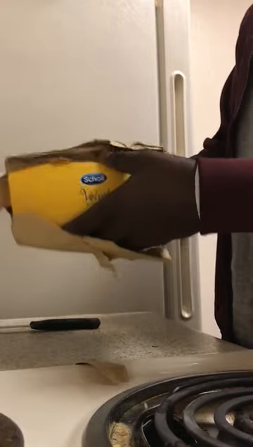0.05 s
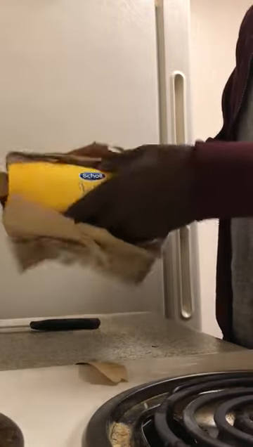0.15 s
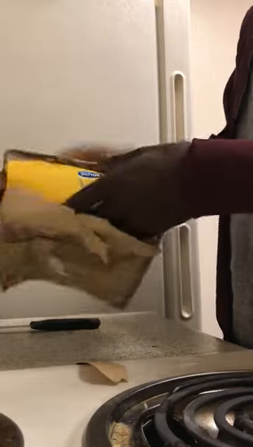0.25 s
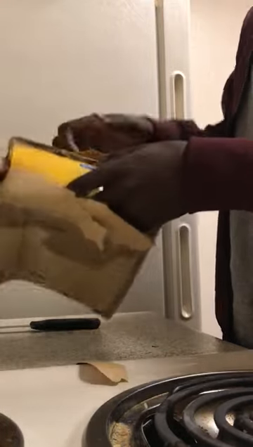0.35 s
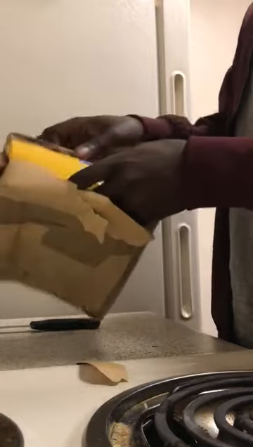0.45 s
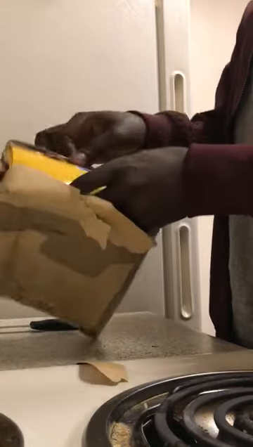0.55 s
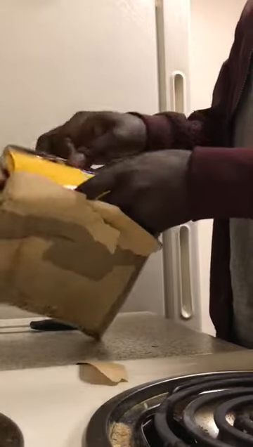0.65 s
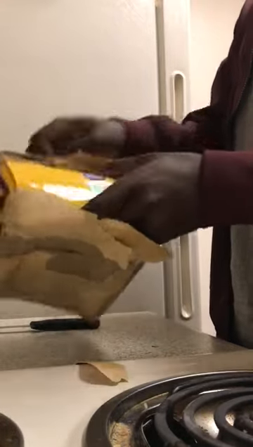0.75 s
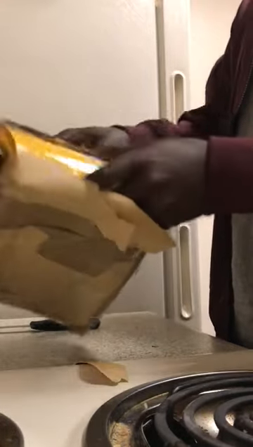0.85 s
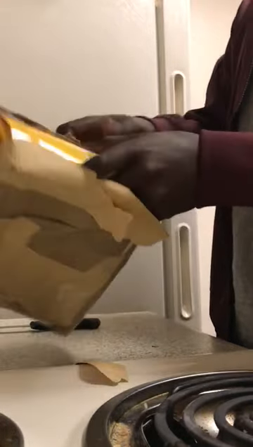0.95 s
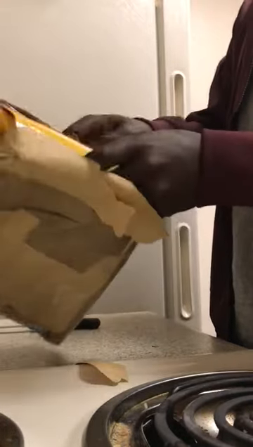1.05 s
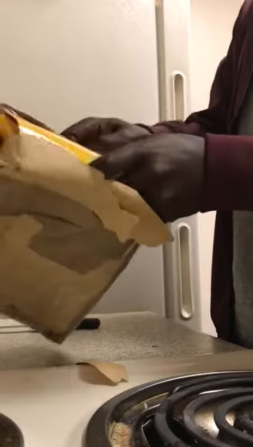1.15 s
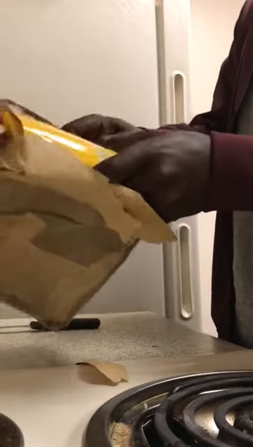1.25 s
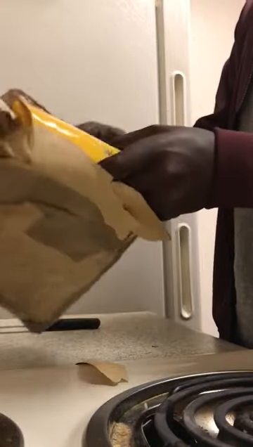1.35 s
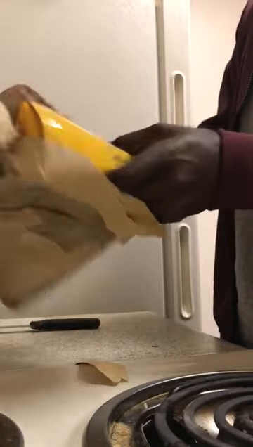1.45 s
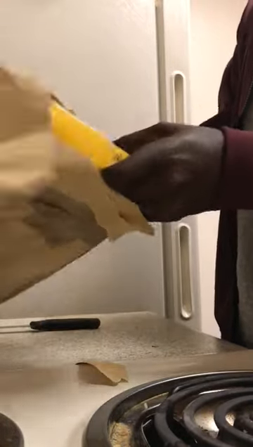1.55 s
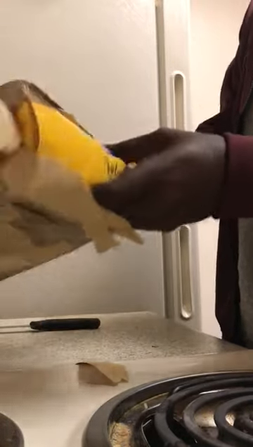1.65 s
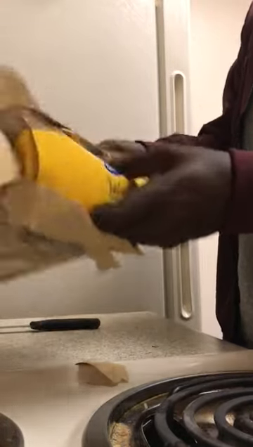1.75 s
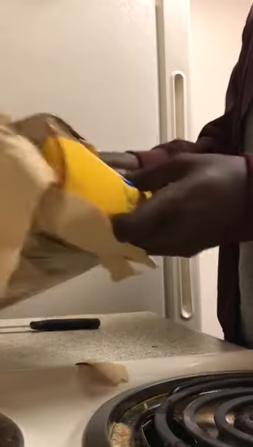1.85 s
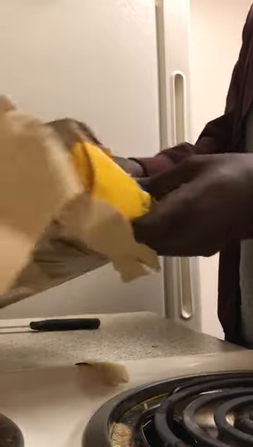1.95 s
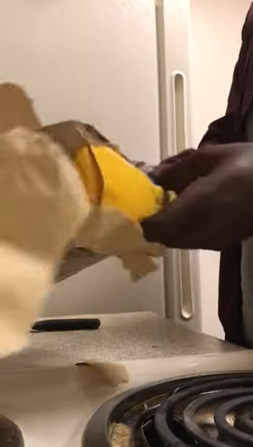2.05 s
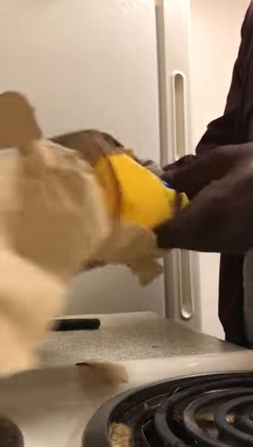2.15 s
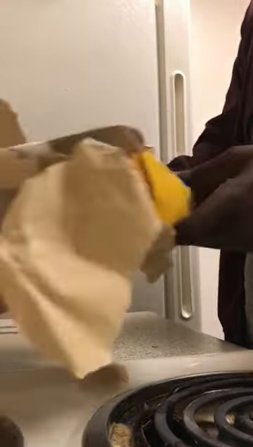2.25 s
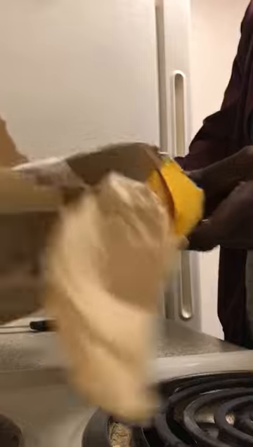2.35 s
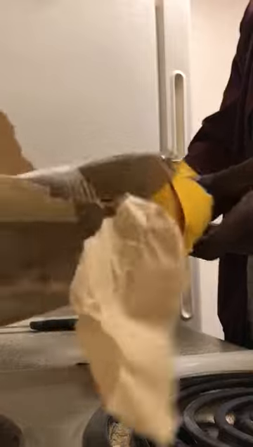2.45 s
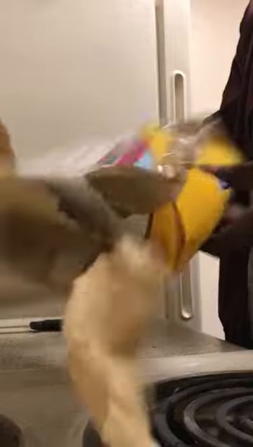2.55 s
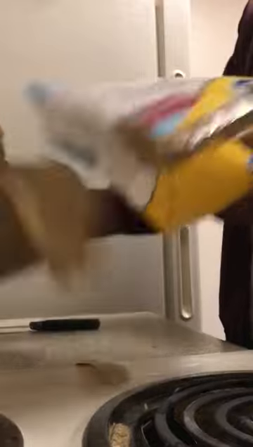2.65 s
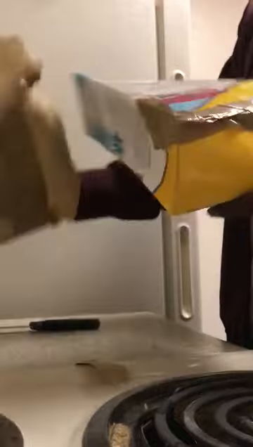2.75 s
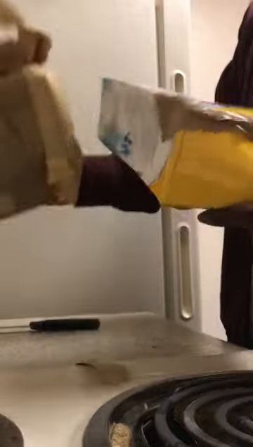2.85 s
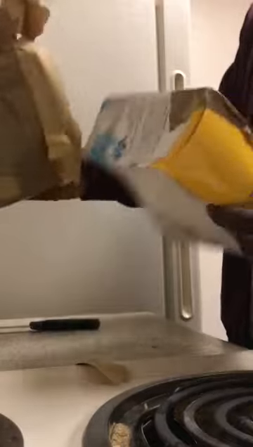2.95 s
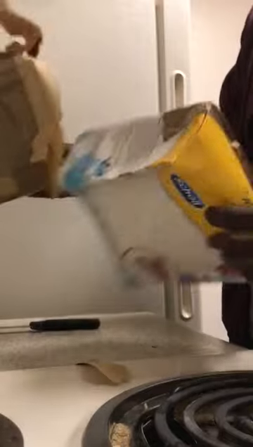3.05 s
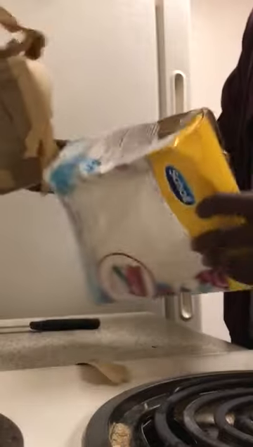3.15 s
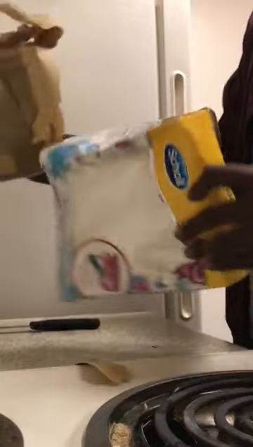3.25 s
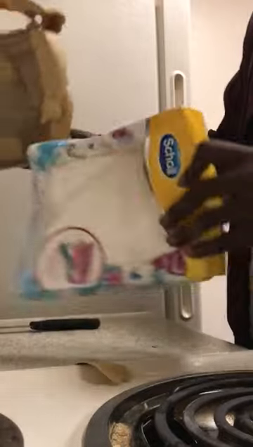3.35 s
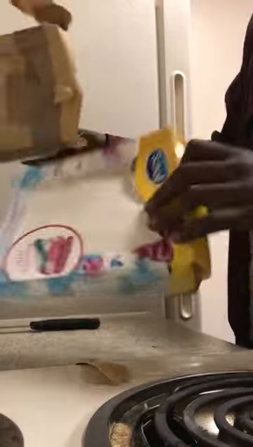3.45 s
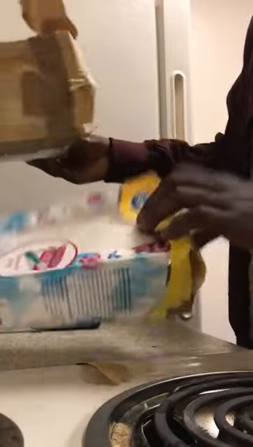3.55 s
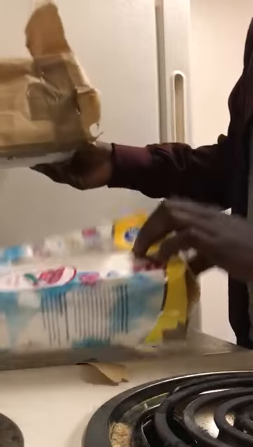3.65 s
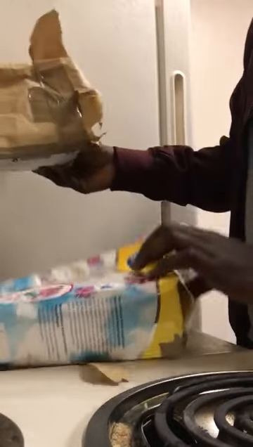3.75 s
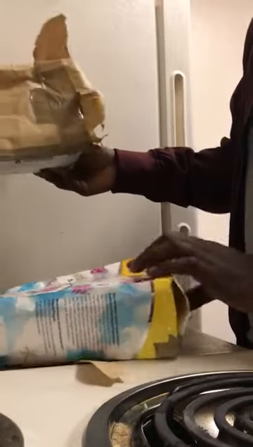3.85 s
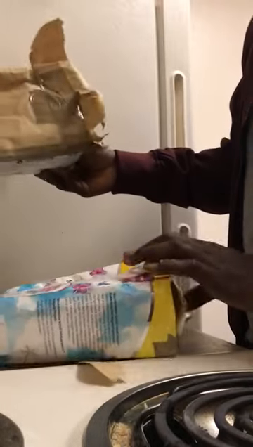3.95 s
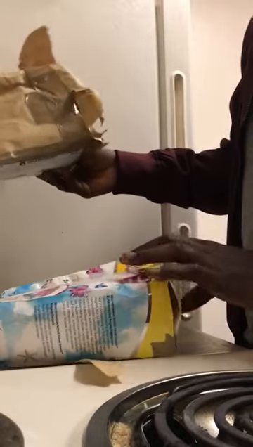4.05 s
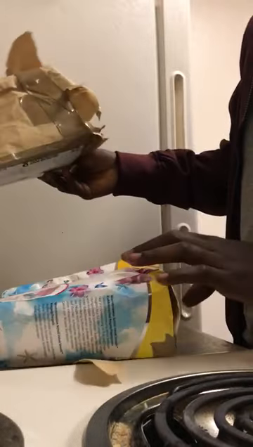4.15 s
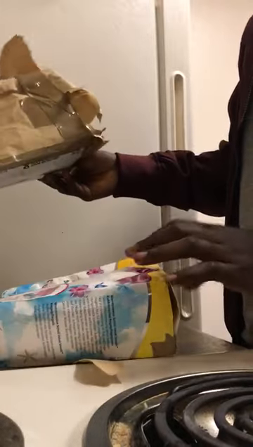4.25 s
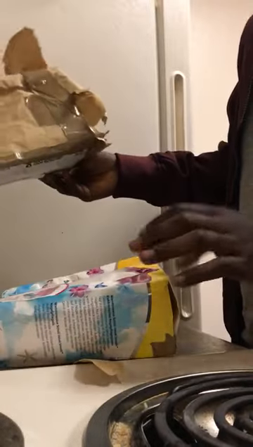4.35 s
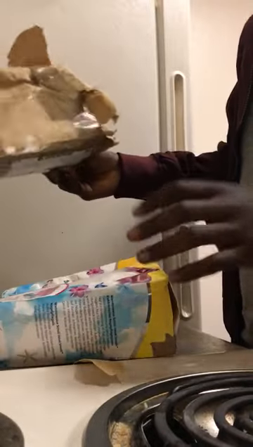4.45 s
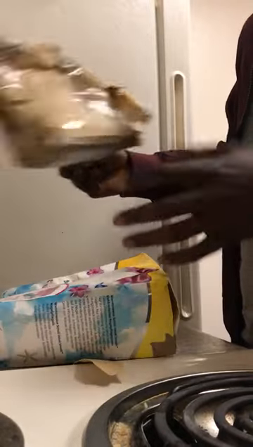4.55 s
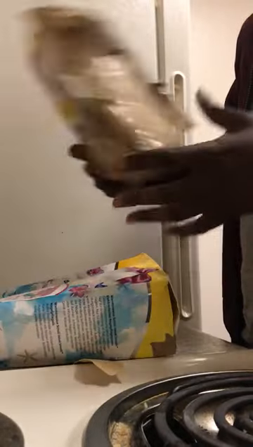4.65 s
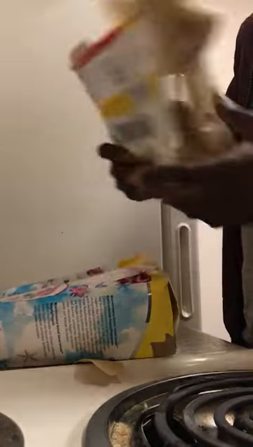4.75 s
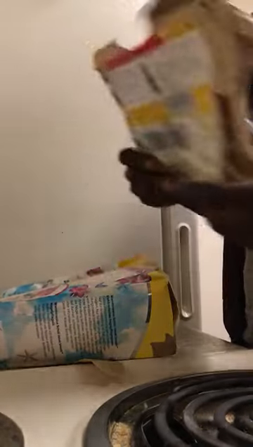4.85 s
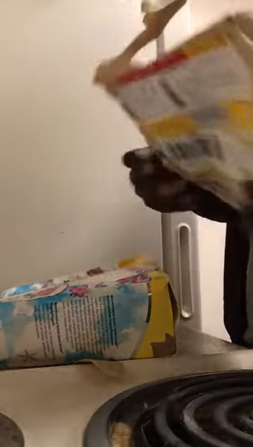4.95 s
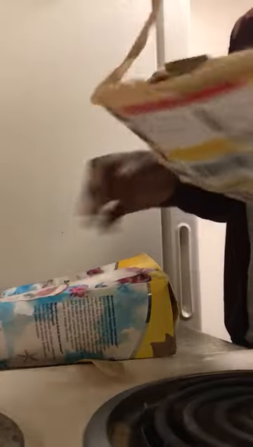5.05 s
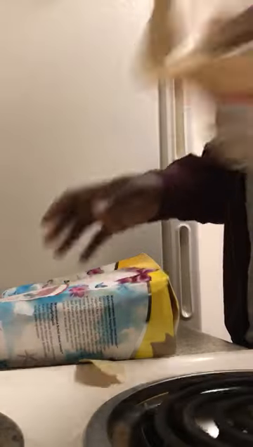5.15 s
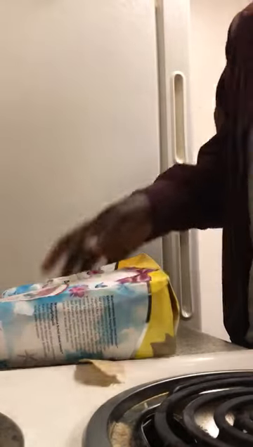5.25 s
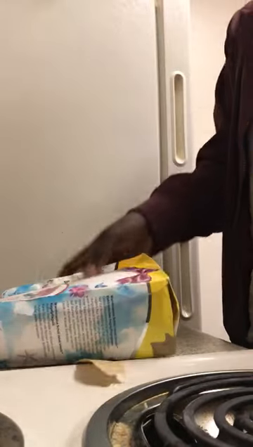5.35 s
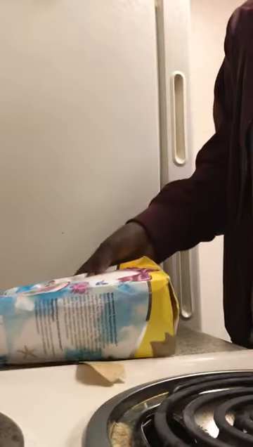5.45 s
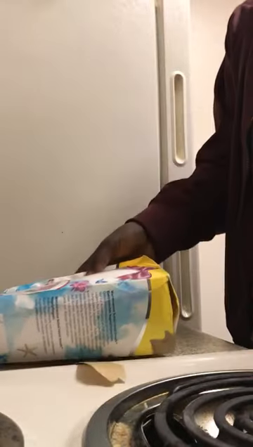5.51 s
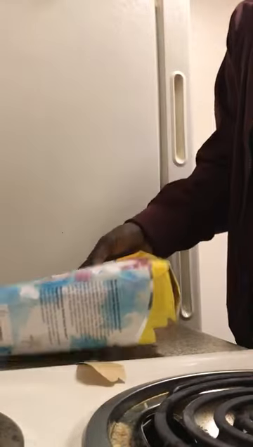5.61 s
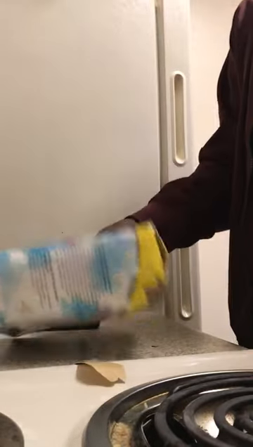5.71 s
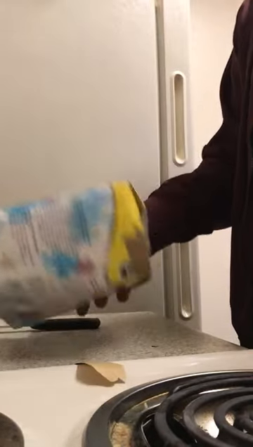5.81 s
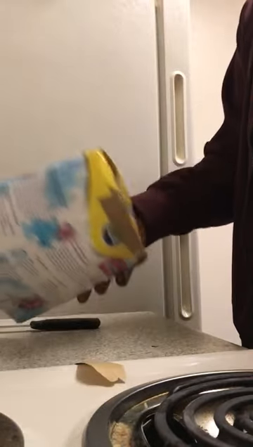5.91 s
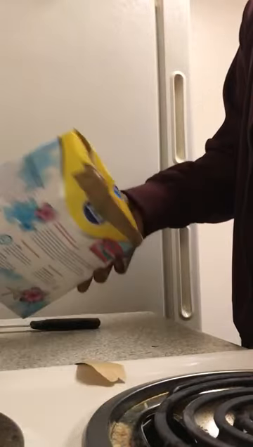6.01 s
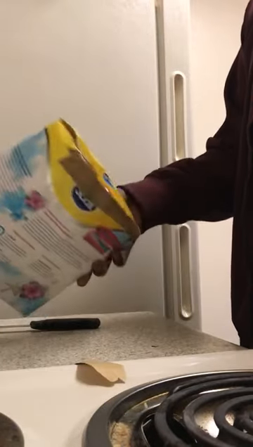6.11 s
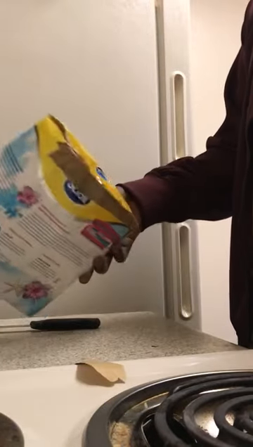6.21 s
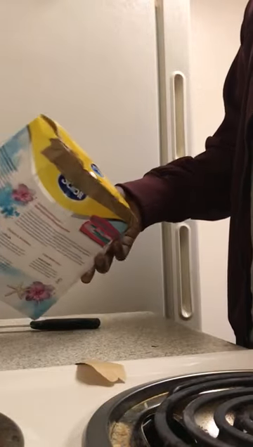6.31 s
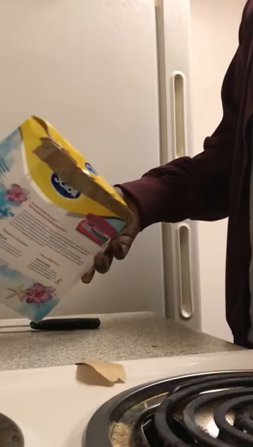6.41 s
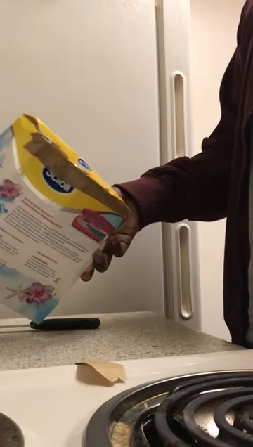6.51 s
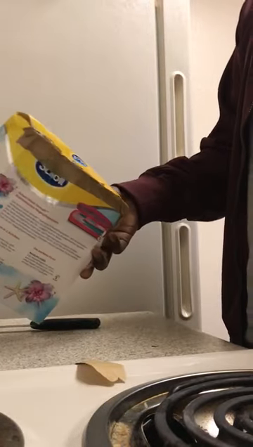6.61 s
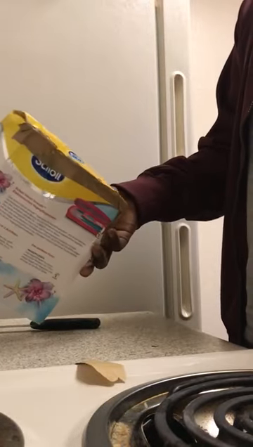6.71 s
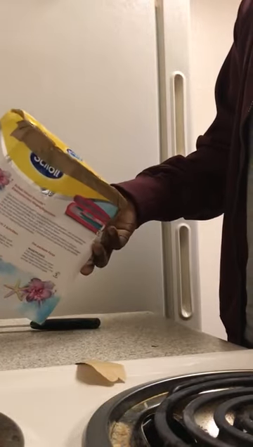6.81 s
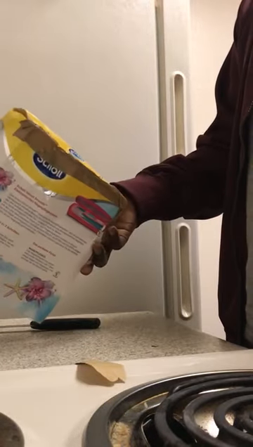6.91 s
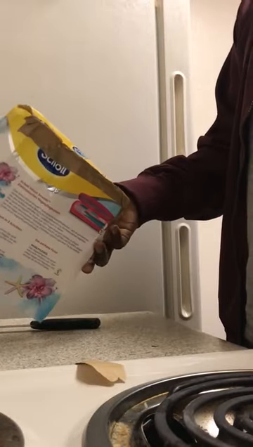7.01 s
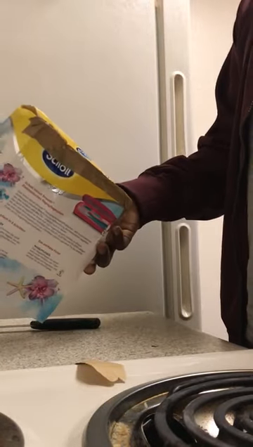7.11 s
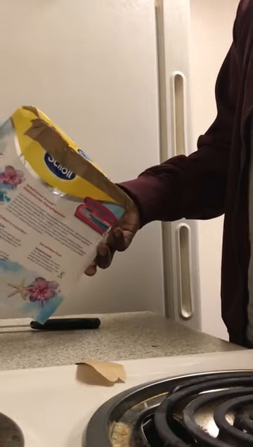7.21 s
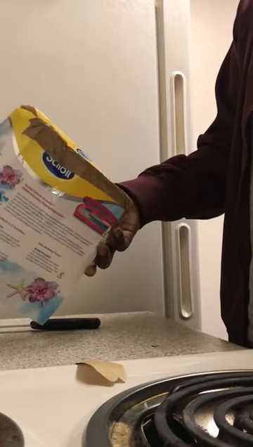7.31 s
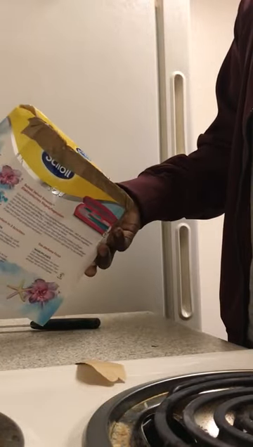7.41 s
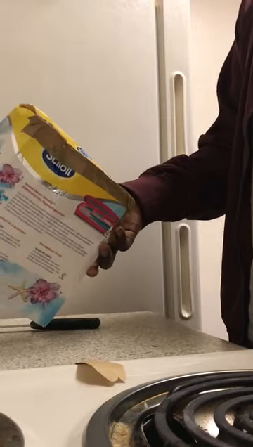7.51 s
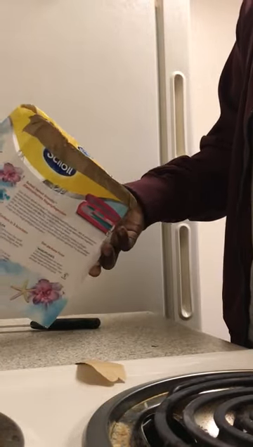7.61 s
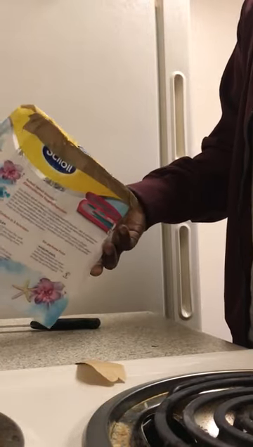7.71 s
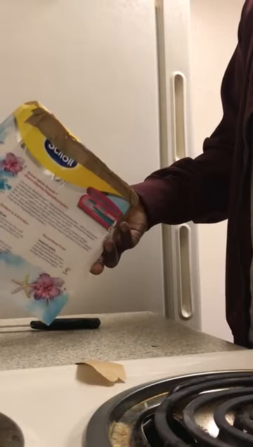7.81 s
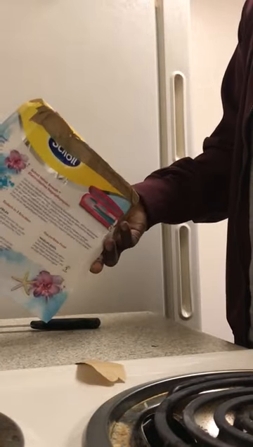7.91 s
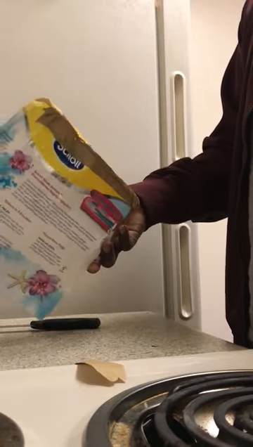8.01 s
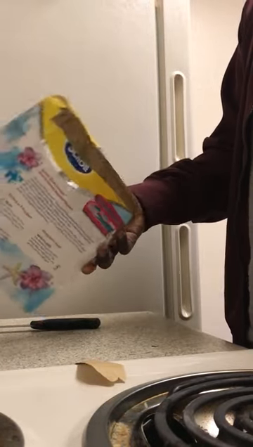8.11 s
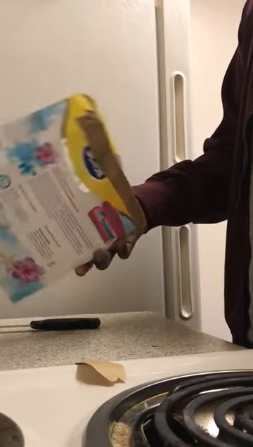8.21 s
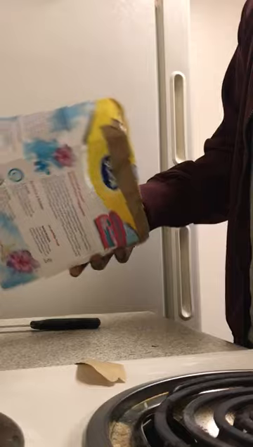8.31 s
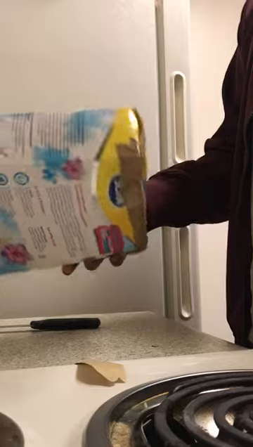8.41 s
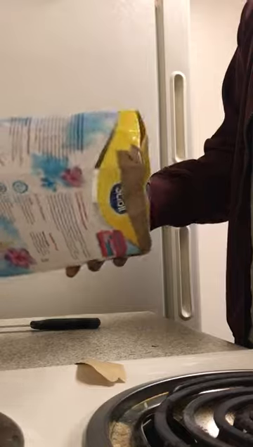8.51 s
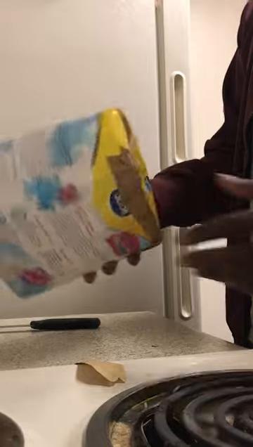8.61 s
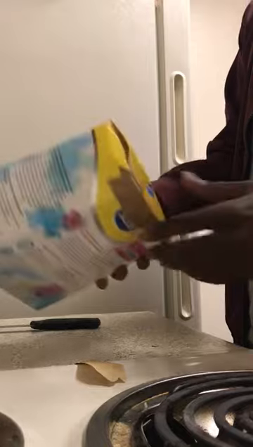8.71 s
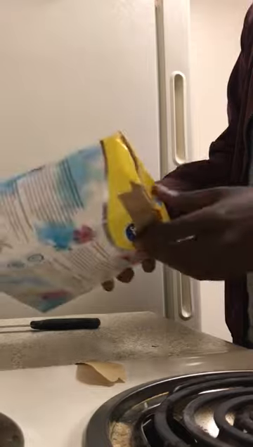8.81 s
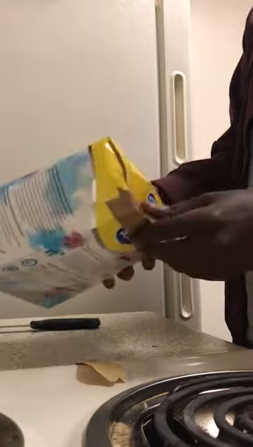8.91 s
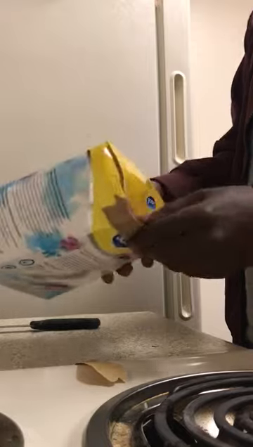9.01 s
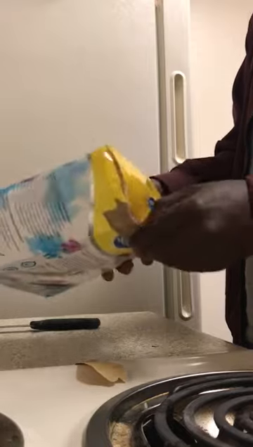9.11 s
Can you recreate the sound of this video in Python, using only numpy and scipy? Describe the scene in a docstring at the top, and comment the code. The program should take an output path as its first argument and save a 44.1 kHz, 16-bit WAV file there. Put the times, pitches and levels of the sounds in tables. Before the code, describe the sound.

Close-up parcel unwrapping: busy crinkles, crisp snaps, one big rip, a hard knock on a stove top, then sparse faint film scrapes and rustling.

```python
"""Brown paper and tape tear off a parcel over a stove in a small kitchen, heard close up.
Paper and tape: flickering noise bands (rustle), short resonances (crinkles), bursts (snaps), click runs (rips).
The plastic-wrapped pack inside knocks on the stove and scrapes in the hand: filtered bursts and click runs.
Behind: noise of pushed air, steady room air and a faint low sine drone that sinks late on."""
import sys
import numpy as np
from scipy import signal
from scipy.fft import rfft, irfft
from scipy.io import wavfile
from scipy.ndimage import uniform_filter1d

SR = 44100
rng = np.random.default_rng(int(sys.argv[2]) if len(sys.argv) > 2 else 0)


def digitize_waveform(pressure):
    """Quantize a signal to 16-bit integers and store it at the path in sys.argv[1].

    Rows of a 2-D input are taken as channels; values are limited to [-1, 1].
    """
    field = np.atleast_2d(pressure).T
    bounded = np.clip(field, -1, 1)
    quanta = np.round(bounded * 32767).astype(np.int16)
    wavfile.write(sys.argv[1], SR, quanta)


N = 404382
TAPS = 2048
HZ = np.fft.rfftfreq(TAPS, 1 / SR)
TIME = np.arange(N) / SR


def gain_of(db):
    """Decibels to amplitude."""
    return 10 ** (np.asarray(db) / 20)


def evened(x):
    """Scales to rms 1."""
    return x / np.sqrt(np.mean(x ** 2) + 1e-20)


def read(points, hz):
    """Interpolates a curve on a log-frequency axis."""
    f, value = np.transpose(points)
    return np.interp(np.log(hz + 1), np.log(f + 1), value)


def add(mix, s, sound):
    """Mixes a sound in at time s."""
    part = mix[max(0, round(s * SR)):][:len(sound)]
    part += sound[:len(part)]


def coloured(spectrum):
    """Steady noise of rms 1 with the given spectrum."""
    hz = np.fft.rfftfreq(N, 1 / SR)
    white = rfft(rng.standard_normal(N))
    return evened(irfft(white * gain_of(read(spectrum, hz)), N))


def wander(beats_per_s):
    """Random control curve, joined by straight lines."""
    beats = np.arange(0, N / SR, 1 / beats_per_s)
    return np.interp(TIME, beats, rng.standard_normal(len(beats)))


def slips(length, per_s, spread_db):
    """Sparse random clicks: many small ones, a few large."""
    sizes = gain_of(spread_db * np.minimum(rng.exponential(1, length), 4))
    return sizes * (rng.random(length) < per_s / SR)


def causal(gain):
    """Sharp-fronted (minimum-phase) impulse response with the given gain at each frequency."""
    log_gain = np.log(np.maximum(gain, gain.max() / 10 ** 4))
    circle = np.concatenate([log_gain, log_gain[-2:0:-1]])
    return np.fft.ifft(np.exp(np.conj(signal.hilbert(circle)))).real


def burst(envelope, size=40):
    """Random force under an envelope: energy of 10 ms at rms 1, even in broad colour."""
    z = rfft(envelope * rng.standard_normal(len(envelope)), 2 * len(envelope))
    z /= np.sqrt(uniform_filter1d(abs(z) ** 2, len(z) // size) + 1e-20)
    force = irfft(z)[:len(envelope)]
    return force / np.linalg.norm(force) * np.sqrt(SR / 100)


def pull(length, per_s=3500, spread_db=1.9, rub=1.0, sag=0.92, rise_s=0.00053, release_s=0.0095):
    """A dense run of clicks that eases off as the tension goes."""
    t = TIME[:round((length + 5 * release_s) * SR)]
    clicks = evened(slips(len(t), per_s, spread_db))
    fibres = evened((clicks + rub) * rng.standard_normal(len(t)))
    easing = sag * (.5 - np.minimum(t / length, 1))
    release = np.maximum(t - length, 0) / release_s
    return fibres * np.exp(easing - release) * (1 - np.exp(-t / rise_s))


# spectrum of a sheet pushing air: (frequency [Hz], relative density [dB])
THUMP_SPECTRUM = [(25, -51.5), (60, -17), (120, -10), (240, -0.5), (450, -3), (700, -3.5), (1300, -9),
                  (4000, -8.5), (12000, -69.5)]
# spectrum of fibres breaking: (frequency [Hz], relative density [dB])
CRACK_SPECTRUM = [(100, -52.5), (400, -19.5), (900, 0), (1600, -3), (3500, 0), (6000, -4), (9000, -7),
                  (12000, -14.5)]


def sheet(drive, hz, flap_db, thump_db, crack_db, q=2.4):
    """A force on the wrapping rings one flap, pushes the whole sheet and cracks its fibres."""
    flap = (1 + (q * (HZ / hz - hz / (HZ + 1))) ** 2) ** (-3 / 4)
    thump = gain_of(read(THUMP_SPECTRUM, HZ))
    crack = gain_of(read(CRACK_SPECTRUM, HZ))
    parts = [(flap, flap_db), (thump, thump_db), (crack, crack_db)]
    power = sum((gain_of(db) * evened(shape)) ** 2 for shape, db in parts)
    return signal.fftconvolve(drive, causal(np.sqrt(power)))


# still room air: (frequency [Hz], relative density [dB])
AIR_SPECTRUM = [(20, -18), (40, -5.5), (62, 3.5), (110, 0), (180, -13), (400, -22), (850, -13),
                (1600, -20.5), (4000, -24.5), (8000, -27.5), (12000, -33)]
AIR_DB = -54.5
# drone before waver: (time [s], level [dB])
DRONE_LEVELS = [(0, -64.5), (3, -64.5), (4.4, -55.5), (5.4, -54), (6.05, -63), (6.9, -48), (7.15, -63.5),
                (7.5, -49), (7.9, -57), (9.17, -68)]
DRONE_HZ, SINK_START_S, SINK_HZ_PER_S = 94.6, 5.8, 4


def background(waver=.25):
    """Room air as steady noise; a wavering sine drone holds its pitch, then sinks steadily."""
    hz = DRONE_HZ - SINK_HZ_PER_S * np.maximum(TIME - SINK_START_S, 0)
    tone = np.sqrt(2) * np.sin(2 * np.pi * np.cumsum(hz) / SR)
    swell = 1 + waver * wander(12)
    drone = gain_of(np.interp(TIME, *np.transpose(DRONE_LEVELS))) * swell * tone
    return drone + gain_of(AIR_DB) * coloured(AIR_SPECTRUM)


# low notes of the corner over the stove: (frequency [Hz], width [Hz], added level [dB])
CORNER_MODES = [(139, 25, -2.5), (246.4, 19, 1.5), (371, 27, 0.5), (449, 13, -8), (645, 55, -17.5)]


def corner(x):
    """Stove top and walls reinforce a few low notes."""
    out = x.copy()
    for hz, width_hz, db in CORNER_MODES:
        out += gain_of(db) * signal.lfilter(*signal.iirpeak(hz, hz / width_hz, fs=SR), x)
    return out


# reverberation: (frequency [Hz], t60 [s])
KITCHEN_T60 = [(100, 0.36), (400, 0.38), (1200, .42), (4000, 0.37), (8000, 0.35), (12000, 0.37)]
# stove top and wall, before random shifts in time: (delay [s], gain re direct sound)
ECHO_TAPS = [(.0011, 0.086), (.0027, 0.29), (.0043, -0.12), (.0069, 0.084), (0.0133, -0.25)]


def response(early_db=-8, early_s=.012, tail_db=-13):
    """From one hand position: direct sound, near echoes, quick scatter around the stove, room tail."""
    t = TIME[:SR * 2 // 3]
    hz, frame_s, z = signal.stft(rng.standard_normal(len(t)), SR, nperseg=256)
    fade = gain_of(-60 * frame_s / read(KITCHEN_T60, hz)[:, None])
    tail = signal.istft(z * fade, SR, nperseg=256)[1][:len(t)]
    tail *= np.minimum(t / 0.014, 1)
    early = rng.standard_normal(len(t)) * np.exp(-t / early_s) * np.minimum(t / 0.0056, 1)
    taps = gain_of(tail_db) * tail / np.linalg.norm(tail)
    taps += gain_of(early_db) * early / np.linalg.norm(early)
    for s, gain in [(0.00076, 1)] + ECHO_TAPS:
        add(taps, s * rng.uniform(.75, 1.4), np.array([gain]))
    return taps / np.linalg.norm(taps)


def kitchen(x, count=9, spots_per_s=25):
    """The moving parcel crossfades through a cycle of spots, each with its own response."""
    spot = TIME * spots_per_s
    out = np.zeros(N)
    for k in range(count):
        share = np.maximum(1 - abs((spot - k) % count - 1), 0)
        out += signal.oaconvolve(x * share, response())[:N]
    return out


# hands on paper, later on the pack: (time [s], length [s], level [dB], body [dB re level],
# crispness [dB re level], share of creasing rather than sliding [0-1])
HAND_GRIPS = [(0, 0.041, -36, -5, -2, .55), (.11, .04, -44.5, 3, -3.5, 0.46),
              (.16, 0.07, -37.5, 4, -5, 0.55), (.485, 0.045, -48, 3, -0.5, .55),
              (.585, 0.1, -46, 3.5, 4, .6), (.765, 0.052, -41, 2, -1.5, .6), (.925, 0.065, -48.5, 1, 3, .6),
              (1.089, 0.038, -42.5, 1, 3, .6), (1.206, 0.25, -35.5, -7.5, -5.5, 0.36),
              (1.485, 0.12, -37.5, -6, 10, 0.63), (1.63, 0.14, -48.5, -4, -4, .6),
              (1.735, 0.29, -38, -5.5, -3.5, .65), (1.981, 0.098, -60, 8, -5, .65),
              (2.075, .2, -37.5, -7.5, -1, .7), (2.29, 0.085, -41, -0.5, -1, 0.72),
              (2.37, 0.19, -39, -4, -1, .65), (2.52, 0.24, -35.5, -3, -2.5, .7),
              (2.8, 0.15, -52.5, -1.5, -1, .6), (3.075, 0.32, -47.5, -2, 1, .35),
              (3.555, .03, -51, -1, -10.5, .3), (3.66, 0.092, -56.5, -4.5, -6, .3),
              (3.81, 0.14, -50.5, 4, -9, .2), (4.25, 0.057, -56, -1, -19, .1), (4.5, 0.26, -59, -6, -4, .1),
              (4.815, 0.089, -43.5, -8, 0, .9), (4.97, 0.12, -52, -7, 0, .85),
              (5.15, 0.079, -54, -6, -3, 0.32), (5.335, .055, -55, -9, 2, .55),
              (5.49, 0.091, -56, 4.5, -3, .45), (5.7, 0.35, -57, -4.5, -9, 0.39),
              (6.015, .04, -46, -13, -3, 0.26), (6.11, 0.055, -64.5, 13, -8, .3),
              (6.2, .04, -51.5, -6, -7.5, .5), (6.54, 0.0073, -53, -3, -9, .5),
              (6.7, 0.065, -54, -5.5, -4.5, 0.46), (6.78, 0.29, -52, -5, -8.5, .55),
              (7.08, 0.17, -50, -12, -6, .5), (7.42, 0.17, -48.5, -13, -0.5, 0.38),
              (7.62, 0.084, -49.5, -5.5, 0, .5), (7.8, 0.18, -57.5, 0, -4, .3),
              (7.92, 0.049, -47.5, -2, 1.5, .4), (8.09, 0.015, -63.5, -17, 17.5, .3),
              (8.33, 0.13, -42.5, -5.5, -3, .3), (8.53, 0.077, -52.5, -7, -4, .3),
              (8.585, 0.041, -44, -4.5, -7.5, 0.25), (8.68, 0.38, -57, -8, -2, .45),
              (9.03, 0.1, -54, 0, -1, .6)]
GRIP_RISE_S, GRIP_RELEASE_DB_PER_S = 0.0074, 234.5
# (level [dB], body [dB], crispness [dB], creasing weight; blended shares are clipped to 0-1)
RESTING = (-69, 2, -2.5, -0.4)


def handling():
    """Level, body, crispness and creasing share per sample: grips rise, hold, release; power weights them."""
    t = TIME[::64]
    power, character = [gain_of(RESTING[0]) ** 2 + 0 * t], [RESTING[1:]]
    for s, length, db, *feel in HAND_GRIPS:
        rise = np.clip((t - s) / GRIP_RISE_S, 0, 1)
        release_db = GRIP_RELEASE_DB_PER_S * np.maximum(t - s - length, 0)
        power.append((rise * gain_of(db - release_db)) ** 2)
        character.append(feel)
    total = np.sum(power, axis=0)
    body, crisp, share = np.transpose(character) @ np.array(power) / total
    controls = (10 * np.log10(total), body, crisp, np.clip(share, 0, 1))
    return [np.interp(TIME, t, c) for c in controls]


# wide swings of sheet and arms: (middle [s], e-fold time each side [s], level [dB])
ARM_SWINGS = [(0.795, 0.11, -52), (1.496, 0.12, -50), (2.68, 0.066, -35), (3.883, 0.043, -37),
              (4.86, 0.096, -47.5), (7.8, 0.16, -48.5), (8.341, 0.026, -42)]
WAFT_DB = -22  # re grip level


def waft():
    """Moving sheets and arms push a little air: low noise following grips and swings."""
    swings = sum(gain_of(db) * np.exp(-abs(TIME - s) / fade_s) for s, fade_s, db in ARM_SWINGS)
    push = np.hypot(swings, gain_of(handling()[0] + WAFT_DB))
    # (frequency [Hz], relative density [dB])
    return push * coloured([(20, -34), (55, 4.0), (110, -1.5), (220, -20.5), (1000, -39)])


# pack on stove and in hand: (time [s], wall resonance [Hz], wall, thump, crack [dB before level_db])
PACK_KNOCKS = [(3.076, 1055, -33, -33, -38.5), (3.13, 1250, -45, -41, -41), (3.561, 1540, -50, -41, -66),
               (3.815, 630, -31, -39, -39), (3.84, 450, -32.5, -45, -36), (3.886, 1070, -22, -29.5, -45),
               (4.0415, 1090, -15, -18.5, -13), (4.227, 1280, -18.5, -20.5, -21.5),
               (5.485, 1260, -28.5, -33, -59), (5.497, 285, -34.5, -45, -62),
               (6.016, 2470, -31.5, -48, -31.5), (6.199, 3070, -41, -64, -55),
               (6.217, 910, -39.5, -42, -44), (6.957, 1010, -42, -47, -60), (8.862, 1340, -33, -35.5, -36),
               (8.914, 1340, -36.5, -34, -39), (9.006, 1350, -39, -36.5, -42),
               (9.122, 625, -39.5, -52, -56), (9.148, 990, -31.5, -52, -28)]
# ringing of pack and stove top: (frequency [Hz], level [dB re thump column], t60 [s])
STOVE_MODES = [(103, -21, 0.16), (149, -19, 0.21), (351, -16, 0.12), (466, 0.5, 0.04)]
# decay time at wall 0 dB; drop in wall level that halves it
KNOCK_DECAY_S, KNOCK_HALVING_DB = 0.019, 40


def knocks(level_db=-1, ring_db=0, damp_hz=5500, damp_s=0.0074):
    """The pack lands with a dense clatter, longer when harder; its air and the stove top boom briefly."""
    t, out = TIME[:SR // 3], np.zeros(N)
    for s, hz, wall_db, thump_db, crack_db in PACK_KNOCKS:
        decay_s = KNOCK_DECAY_S * 2 ** (wall_db / KNOCK_HALVING_DB)
        force = burst(np.exp(-t / decay_s))
        clatter = sheet(force, hz, wall_db, thump_db, crack_db, q=1.68)[:len(t)]
        # the soft pack swallows treble first
        dull = signal.lfilter(*signal.butter(1, damp_hz, fs=SR), clatter)
        add(out, s, gain_of(level_db) * (dull + (clatter - dull) * np.exp(-t / damp_s)))
        ring = np.zeros(len(t))
        for f, db, t60 in STOVE_MODES:
            ring += rng.choice([-1, 1]) * gain_of(db - 60 * t / t60) * np.sin(2 * np.pi * f * t)
        add(out, s, gain_of(thump_db + ring_db) * ring)
    return out


# fingers and counter on the pack: (time [s], length [s], wall resonance [Hz], wall, crack [dB before level_db])
PACK_SCRAPES = [(3.244, 0.029, 1260, -37.5, -50), (3.397, 0.023, 1310, -44, -41.5),
                (6.764, 0.028, 906, -47.5, -58.5), (6.923, .045, 950, -50, -55),
                (7.079, 0.085, 910, -44, -47), (7.211, 0.012, 727, -46, -32),
                (7.428, 0.017, 880, -51, -47.5), (7.542, .018, 1370, -37.5, -42),
                (7.679, 0.026, 1640, -43, -45), (8.32, 0.02, 710, -25, -37.5),
                (8.329, 0.036, 1500, -28.5, -26.5), (8.367, .04, 1280, -31.5, -31.5)]
SCRAPE_THUMP_DB = -5  # re wall


def scrapes(level_db=-1):
    """The plastic film sticks and slips, shaking the wall of the pack."""
    out = np.zeros(N)
    for s, length, hz, wall_db, crack_db in PACK_SCRAPES:
        add(out, s, sheet(pull(length), hz, wall_db, wall_db + SCRAPE_THUMP_DB, crack_db))
    return gain_of(level_db) * out


# how strongly facets of each size sound: (frequency [Hz], relative level [dB])
FACET_LEVELS = [(170, -17), (260, -8.5), (400, -11.5), (700, -9), (1200, -5.5), (2000, -7.5), (3300, -5),
                (5500, -4.5), (8000, -6), (11000, -7.5)]


def facet_db(hz, level_db, body_db, crisp_db):
    """Loose sheets favour large, low facets; taut film favours small, bright ones."""
    large = np.clip(np.log2(1150 / hz), 0, 1)
    small = np.clip(np.log2(hz / 2500), 0, 1)
    return level_db + large * body_db + small * crisp_db + read(FACET_LEVELS, hz)


def rustle(wander_db=2.5, count=14, per_s=600, spread_db=4.6):
    """Tiny creases give way all over the sheet, each shaking facets of many sizes, over smooth rubbing."""
    *controls, share = handling()
    creasing = evened(slips(N, per_s, spread_db))
    force = np.sqrt(share * creasing ** 2 + 1 - share)
    out = np.zeros(N)
    for hz in np.geomspace(190, 10800, count):
        edges_hz = [hz / 2 ** (1 / 4), hz * 2 ** (1 / 4)]
        band = signal.butter(2, edges_hz, "band", fs=SR, output="sos")
        ring = evened(signal.sosfilt(band, force * rng.standard_normal(N)))
        bending_db = wander_db * wander(40)  # facets change as the sheet bends
        out += ring * gain_of(facet_db(hz, *controls) + bending_db)
    return out


def crinkles(level_db=-6, cycles=4.8, count=32, per_s=7, spread_db=3.6):
    """Single facets flip over, each with a few cycles of its own pitch."""
    *controls, share = handling()
    t, out = TIME[:TAPS], np.zeros(N)
    for hz in np.geomspace(600, 9500, count):
        flip = np.exp(-t * hz / cycles) * np.sin(2 * np.pi * hz * t)
        flips = evened(signal.oaconvolve(slips(N, per_s, spread_db), flip)[:N])
        out += flips * gain_of(level_db + facet_db(hz, *controls))
    return out * share


# loudest creases buckling: (time [s], flap resonance [Hz], flap, thump, crack [dB before level_db])
CREASE_SNAPS = [(.031, 1250, -37, -40, -37), (.0525, 6160, -27, -35.5, -27), (.158, 3330, -30.5, -37, -40),
                (0.1991, 1200, -23.5, -51, -24), (.485, 3550, -43, -40, -40),
                (0.5925, 1190, -31.5, -34.5, -28.5), (0.6425, 3930, -31.5, -39, -39),
                (0.6656, 1250, -32.5, -38, -50), (0.7619, 3360, -33, -32.5, -32),
                (0.7924, 5100, -32, -52, -37), (.804, 8900, -31, -41, -43), (.818, 3520, -31, -34.5, -32),
                (.921, 1190, -30.5, -32.5, -55), (.977, 2100, -25, -34.5, -27),
                (1.0665, 5360, -35, -60, -53), (1.1015, 5000, -32.5, -38, -42),
                (1.1299, 650, -37, -47, -25.5), (1.1997, 2500, -30, -37.5, -31),
                (1.2365, 2020, -29, -48, -26.5), (1.312, 1320, -25.5, -31, -55),
                (1.3318, 2950, -40, -23.5, -22.5), (1.3514, 503, -32, -26, -46),
                (1.4004, 2620, -26, -31.5, -50), (1.4864, 1430, -27, -22, -21),
                (1.6003, 1450, -28, -23, -29), (1.7285, 3150, -15.5, -30, -19),
                (1.7699, 2950, -31, -35, -34), (1.8468, 1760, -29, -32.5, -42),
                (1.8977, 2760, -24, -34, -43), (1.9263, 2796, -33, -25.5, -33),
                (1.9498, 400, -34, -27, -55), (2.0705, 4090, -27.5, -35, -26), (2.077, 3590, -32, -60, -31),
                (2.098, 8430, -26, -60, -29.5), (2.1338, 2950, -22.5, -23.5, -24),
                (2.1584, 6070, -19, -57, -47), (2.1774, 3800, -32.5, -45, -25.5),
                (2.1974, 1358, -36, -53.5, -24.5), (2.2373, 2580, -21.5, -36, -21),
                (2.2778, 1250, -27.5, -43, -29), (2.374, 690, -35, -50, -28), (2.3848, 6000, -31, -52, -41),
                (2.4033, 1170, -26, -32, -26), (2.4496, 2760, -22.5, -29, -44.5),
                (2.4592, 7890, -25, -53, -22.5), (2.4725, 1430, -26.5, -27.5, -55),
                (2.511, 5320, -28.5, -60, -31), (2.5424, 1274, -18.5, -29.5, -19.5),
                (2.5669, 3360, -26, -18.5, -9), (2.6054, 4370, -12, -15, -5.5),
                (3.8097, 2990, -37, -35, -36), (4.0033, 1180, -34.5, -40.5, -40),
                (4.2, 1295, -41, -39.5, -51.5), (4.8712, 9100, -28, -51, -29.5),
                (4.972, 3170, -33.5, -52, -28), (4.9879, 5960, -30, -43, -35), (5.0763, 900, -44, -60, -41),
                (5.1549, 5860, -26, -44, -31.5), (5.162, 5050, -38.5, -36.5, -29),
                (5.5768, 6600, -34, -61, -42), (5.844, 1330, -43.5, -62, -48), (6.925, 1400, -44, -51, -52),
                (7.083, 740, -53, -55, -37), (7.506, 2420, -33.5, -54, -51), (8.291, 577, -46, -59, -41.5),
                (9.0716, 4770, -21.5, -58, -32.5)]


def snaps(level_db=-1, crack_s=0.00086, flutter=0.15, flutter_s=0.0052):
    """A crease pops through in about a millisecond and the sheet flutters briefly."""
    t, out = TIME[:TAPS], np.zeros(N)
    envelope = np.exp(-t / crack_s) + flutter * np.exp(-t / flutter_s)
    for s, *colour in CREASE_SNAPS:
        add(out, s, sheet(burst(envelope), *colour))
    return gain_of(level_db) * out


# paper and tape: (time [s], length [s], crack [dB before level_db], thump [dB before level_db])
PAPER_RIPS = [(0.154, 0.067, -27, -32), (0.199, 0.029, -25, -37), (0.577, 0.013, -33.5, -53),
              (1.328, 0.034, -28.5, -42), (1.509, 0.035, -17, -20.5), (1.541, 0.037, -24, -37),
              (1.567, 0.029, -16.5, -36), (2.562, 0.0072, -26.5, -37), (2.604, .022, -10.5, -30.5),
              (2.637, 0.044, -19, -26), (2.686, 0.023, -20, -21), (2.731, 0.027, -20, -33),
              (4.813, 0.013, -38, -55)]
RIP_FLAP_HZ, RIP_FLAP_DB = 1260, -13  # flap level re crack


def rips(level_db=-1):
    """Fibres part one after another along the tear; the loose flap beside it rings along."""
    out = np.zeros(N)
    for s, length, crack_db, thump_db in PAPER_RIPS:
        add(out, s, sheet(pull(length), RIP_FLAP_HZ, crack_db + RIP_FLAP_DB, thump_db, crack_db))
    return gain_of(level_db) * out


def scene():
    """Everything the hands do, heard in the kitchen over its background."""
    parcel = rustle() + crinkles() + snaps() + rips() + scrapes() + knocks()
    return (kitchen(corner(parcel)) + waft() + background())[None]


def record(dry, ceiling=.88, edge_hz=12150):
    """Rounds off peaks smoothly below the ceiling, then limits the band."""
    low_pass = signal.firwin(301, edge_hz, window=("kaiser", 8), fs=SR)
    return signal.oaconvolve(ceiling * np.tanh(dry / ceiling), low_pass[None], "same")


dry = scene()
out = record(dry)
digitize_waveform(out)
```